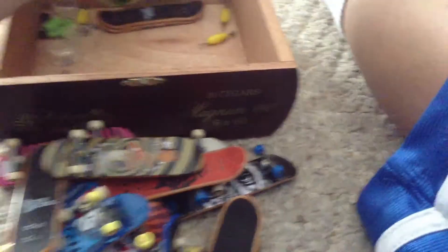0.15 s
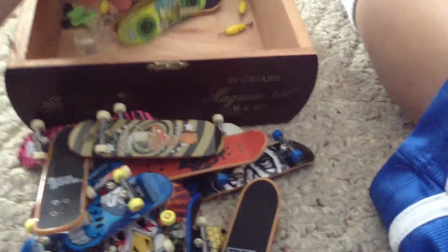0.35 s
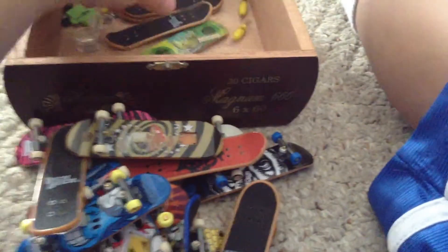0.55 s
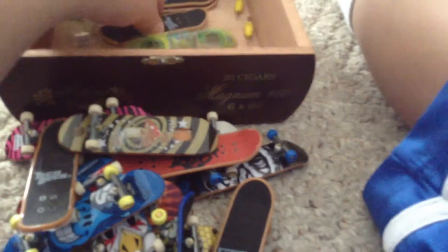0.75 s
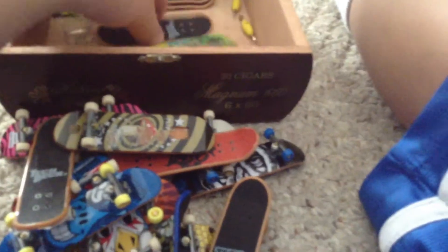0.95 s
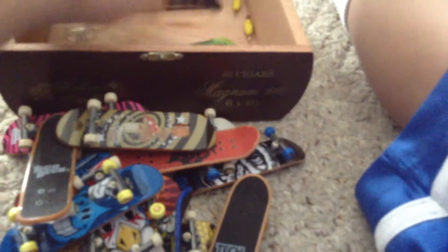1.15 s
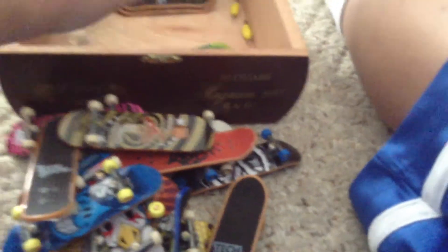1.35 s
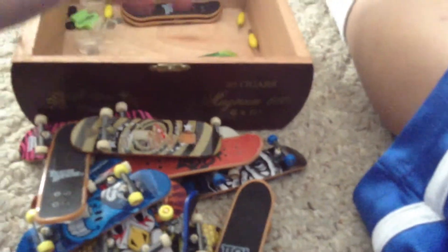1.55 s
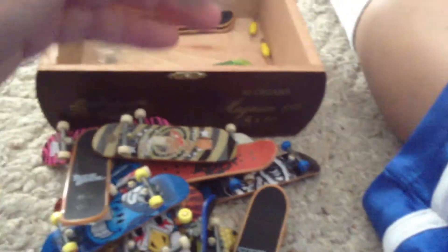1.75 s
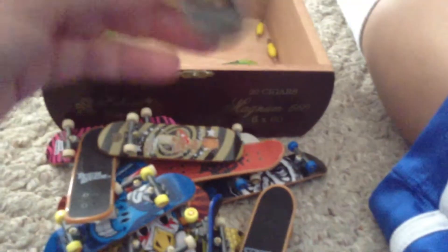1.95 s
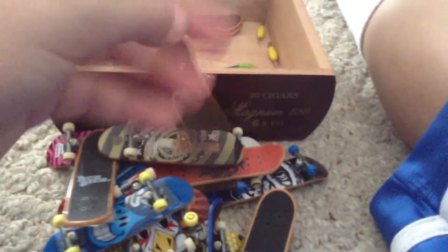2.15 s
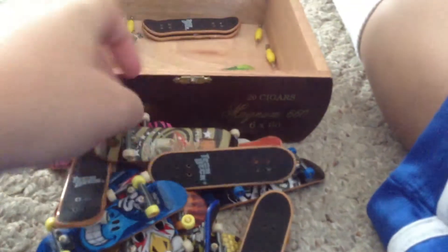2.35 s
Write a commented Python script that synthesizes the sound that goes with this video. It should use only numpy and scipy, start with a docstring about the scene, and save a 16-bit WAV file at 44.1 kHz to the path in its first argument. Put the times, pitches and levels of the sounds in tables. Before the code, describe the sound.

Small hard toy boards clatter and slide in a wooden box, soft hand bumps follow, then after a quiet gap one sharp knock and quick bright clicks on a pile; small quiet room, close microphone.

```python
"""A small quiet room: a hand drops and shuffles small plastic toy boards in a wooden box, then picks at a pile
of them on a carpet. Each contact is a brief noise crack that excites damped resonances of the box, wheels or a deck.
Random stick-slip catches make the sliding and rubbing; damped low tones with dull noise make the hand's bumps.
Filtered noise makes an arm brushing past and the still air, and decaying noise echoes make the room's answer."""
import sys
import numpy as np
from scipy import signal
from scipy.fft import rfft, irfft
from scipy.io import wavfile

SR = 44100
rng = np.random.default_rng(int(sys.argv[2]) if len(sys.argv) > 2 else 0)


def master(y):
    """Save y as 16-bit WAV."""
    cut = np.clip(np.atleast_2d(y).T, -1, 1)
    pcm = np.round(cut * 32767)  # scale
    wavfile.write(sys.argv[1], SR, pcm.astype(np.int16))


N = 110250  # length in samples

# Boards falling and knocking in the box. Each row: start in seconds, relative level in dB, tilt in dB per octave,
# contact time scale in ms, note of the struck board in Hz.
BOX_HITS = [(.2455, -8, 0.5, 3.3, 2210), (.2625, -9, 2, 2.4, 2760), (.2715, -10, 1, 1.4, 6130),
            (.279, -0.5, 0, 0.98, 3383), (.2855, -6, -1.5, 1.5, 3460), (.3175, -6.5, -1.5, 2.7, 3370),
            (.3762, -3, 1.5, 2.1, 2420), (.390, -25, -0.5, 5, 2410), (.4165, -8.5, 3, 2.1, 3460),
            (.4375, -19, -2.5, 3.5, 3450), (.443, -12, -0.5, 3.3, 2450), (.455, -13.5, 1.5, 7.7, 3410),
            (.4745, -13.5, 0.5, 2.1, 5020), (.535, -21.5, -4.5, 3.8, 2220), (.552, -19, 1, 5.2, 2280),
            (.628, -23, 0, 8.5, 3000), (.6485, -7, -0.5, 4.9, 2390), (.661, -2, 2, 1.7, 4200),
            (.863, -22, -1.5, 6.7, 2170), (.871, -19.5, 0, 1.4, 4200), (.925, -26, -3, 2.6, 2190),
            (.936, -22.5, -4, 11, 1920), (.968, -29.5, -1, 4.4, 760), (1.0095, -17, 2.5, 2.5, 3140),
            (1.020, -25, 0.5, 3.5, 3230)]
# Resonances of the box. Each row: frequency in Hz, relative level in dB, 60 dB decay time in seconds.
BOX_MODES = [(315, -10.5, 0.12), (395.4, -8.5, 0.069), (678.5, -5, 0.066), (818, -7.5, 0.035),
             (1208, -9, 0.088), (1692, -2.5, 0.019), (1878, -10.5, 0.12), (2472, -3, 0.05),
             (5050, -9, .015)]
# Colour of a crack in the box. Each row: frequency in Hz, gain in dB.
BOX_CRACK_COLOUR = [(150, -30), (330, -3.5), (1000, -2), (2200, 1.5), (2900, -4.5), (5200, -7),
                    (9000, -15.5), (15500, -29)]
BOX_DB, BOX_RING_DB = -25.5, -3  # all contacts; ring against crack


def box_hits():
    """Impact excitation: boards strike the wooden box and set its modes ringing."""
    hits = strikes(BOX_HITS, BOX_CRACK_COLOUR, BOX_MODES, BOX_RING_DB, detune=0.018, wet_db=-1)
    return undb(BOX_DB) * hits


# Bright clicks of wheels and deck edges, mostly on the pile. Each row: start in seconds, relative level in dB,
# tilt in dB per octave, contact time scale in ms.
PILE_CLICKS = [(.2455, -11, 1, 1.17), (2.0785, -22, -6, 0.91), (2.0872, -30, -3, 1.2),
               (2.090, -15, -1.5, 6.7), (2.1503, -18, -3, 4.7), (2.1923, -14, -0.5, 2.1),
               (2.2003, -10.5, 9, 0.4), (2.203, -6.5, 1.5, 0.87), (2.206, -17.5, -2, 1.9),
               (2.2112, -8, 5, 0.59), (2.2413, -21.5, -2.5, 0.64), (2.259, -23.5, -3, 2.2),
               (2.289, -31.5, 0.5, 5.5)]
# Resonances of the wheels. Each row: frequency in Hz, relative level in dB, 60 dB decay time in seconds.
WHEEL_MODES = [(6125, -6, 0.0059), (8120, -1, 0.0051)]
# Colour of a crack on the pile. Each row: frequency in Hz, gain in dB.
PILE_CRACK_COLOUR = [(60, -46.5), (250, -8), (600, -4), (1100, -15.5), (2000, 0), (4000, -5), (6500, 1.5),
                     (10000, 1), (15500, -5)]
PILE_DB, PILE_RING_DB = -25, -4  # all contacts; ring against crack


def pile_clicks():
    """Impact of small stiff parts: short contacts excite high, quickly damped modes."""
    clicks = strikes(PILE_CLICKS, PILE_CRACK_COLOUR, WHEEL_MODES, PILE_RING_DB, detune=0.03, wet_db=-2)
    return undb(PILE_DB) * clicks


# Blows that ring a whole deck. Each row: start in seconds, relative level in dB, tilt in dB per octave,
# contact time scale in ms.
DECK_KNOCKS = [(2.0785, 2, 0.5, 0.86), (2.2225, -21, -4, 2.3), (2.262, -31, 1, 2.2), (2.399, -33, -4, 4.3),
               (2.425, -35, -5.5, 5), (2.477, -40.5, 1, 3.2)]
# Resonances of a deck. Each row: frequency in Hz, relative level in dB, 60 dB decay time in seconds.
DECK_MODES = [(322, -16.5, 0.057), (778.4, 4, 0.068), (792.4, 1, 0.063), (1207, -9, 0.036),
              (1660, 2.5, 0.007), (1973, -3.5, 0.025), (2430, -8.5, 0.2), (2550, -5.5, 0.074),
              (4100, -4.5, 0.023)]
# Colour of a crack on a deck. Each row: frequency in Hz, gain in dB.
DECK_CRACK_COLOUR = [(160, -29), (350, -3), (800, -20.5), (1800, 3.5), (3800, -6.5), (15000, -29)]
DECK_DB, DECK_RING_DB = -26.5, 3.5  # all contacts; ring against crack


def deck_knocks():
    """Modal vibration of a plate: a blow rings the whole deck."""
    knocks = strikes(DECK_KNOCKS, DECK_CRACK_COLOUR, DECK_MODES, DECK_RING_DB, detune=0.0024, wet_db=-5)
    return undb(DECK_DB) * knocks


BOARD_RING_DB, BOARD_T60_S = -5.5, 0.028


def strikes(hits, crack_colour, modes, ring_db, detune, wet_db, size=4096):
    """Modal superposition: each crack excites the modes differently, and a loose board adds its own note."""
    out = np.zeros(N)
    t = np.arange(size) / SR
    mode_hz, mode_db, mode_t60 = np.array(modes).T
    for at, db, tilt, ms, *board_notes in hits:
        hz_spread, phase_spread = rng.standard_normal((2, len(mode_hz)))
        struck_hz = mode_hz * (1 + detune * hz_spread)
        gains = undb(mode_db + tilt * np.log2(mode_hz / mode_hz.mean()))
        ring = np.zeros(size)
        for gain, hz, t60, phase in zip(gains, struck_hz, mode_t60, np.pi * phase_spread):
            ring += gain * mode(t, hz, t60, phase)
        board = sum(mode(t, hz, BOARD_T60_S) for hz in board_notes)
        contact = unit(colour(crack(t, ms), crack_colour, tilt))
        contact = contact + undb(ring_db) * unit(ring) + undb(BOARD_RING_DB) * board
        add(out, at, room(undb(db) * unit(contact), wet_db))
    return out


PATCH_HZ, PATCH_DB = 420, 4.5  # spacing and spread of the spectral peaks and dips


def crack(t, ms, rise=0.12):
    """Broadband excitation: micro-contacts die in a few ms, with peaks and dips set by the spot struck."""
    u = t * 1000 / max(ms, 0.2)  # time in units of the contact time scale
    burst = rng.standard_normal(len(t)) * np.exp(-(u / 1.6) ** 1.6) * (1 - np.exp(-u / rise))
    spot_hz = np.arange(PATCH_HZ, SR / 2, PATCH_HZ)
    spread = np.clip(rng.standard_normal(len(spot_hz)), -1.5, 1.5)
    spot_db = PATCH_DB * spread * np.minimum(spot_hz / 2500, 1)  # smaller in the bass
    # Dividing by the root of the magnitude halves the spectrum's unevenness in dB.
    spectrum = rfft(burst)
    even = irfft(spectrum / np.sqrt(np.abs(spectrum) + 1e-9)) * np.exp(-(u / 5) ** 2)
    return unit(colour(even, np.c_[spot_hz, spot_db]))


def mode(t, hz, t60, phase=0):
    """Damped harmonic oscillation: one resonance with a soft onset and an energy of one."""
    decay = np.exp(-np.log(1000) * t / t60)
    onset = 1 - np.exp(-t * hz)
    return unit(np.sin(2 * np.pi * hz * t + phase) * decay * onset)


# Soft bumps of the hand on the box. Each row: start in seconds, relative level in dB, pitch in Hz, decay in ms.
BUMPS = [(.002, -22.5, 409, 12.3), (0.59, -20.5, 192, 7.3), (0.613, -15, 216, 7.9),
         (0.95, -24.5, 417, 12.7), (0.975, -18.5, 315, 7.2), (1.358, -30.5, 322, 3)]
BUMP_DB = -33


def bumps(knock_db=-5, size=6000):
    """Soft impact: flesh on wood gives a low damped note and a dull noise knock."""
    out = np.zeros(N)
    t = np.arange(size) / SR
    knock_colour = [(70, -23.0), (200, 0), (650, 4.5), (1500, -24.5), (6000, -42)]  # Hz, dB
    for at, db, hz, ms in BUMPS:
        fade = np.exp(-t * 1000 / ms)
        note = np.sin(2 * np.pi * hz * t) * fade * (1 - np.exp(-t / 0.0031))
        knock = colour(rng.standard_normal(size) * fade, knock_colour)
        add(out, at, undb(db) * (unit(note) + undb(knock_db) * unit(knock)))
    return out * undb(BUMP_DB)


# Boards sliding in the box. Each row: time in seconds, level in dB.
SLIDE = [(0, -43), (0.037, -65.5), (0.233, -60.5), (0.261, -28.5), (.33, -46), (.36, -36.5), (.45, -37.5),
         (.52, -59.5), (.60, -59), (0.689, -36), (.76, -53), (.85, -43), (.97, -51), (1.1, -76.5)]
GRAINS_PER_S = 900


def slide(tilt=-1, ring_db=-7, size=8000):
    """Stick-slip friction: dense tiny catches of sliding boards, heard through the box's modes."""
    t = np.arange(size) / SR
    grains = catches(GRAINS_PER_S, N)
    box_response = sum(undb(db) * mode(t, hz, t60) for hz, db, t60 in BOX_MODES)
    ring = signal.fftconvolve(grains, box_response)[:N]
    scrape = unit(colour(grains, BOX_CRACK_COLOUR, tilt))
    return shaped(scrape + undb(ring_db) * unit(ring), SLIDE)


# Short rubs of fingers and boards. Each row: middle in seconds, length in seconds, level in dB,
# centre frequency in Hz, bandwidth in Hz.
RUBS = [(0.128, 0.031, -56.5, 9800, 6000), (.18, 0.063, -60, 9500, 5000), (0.832, 0.072, -50, 5150, 600),
        (0.973, 0.044, -41, 670, 350), (2.291, .035, -51.5, 2630, 447), (2.41, .09, -54, 774, 171),
        (2.412, .1, -57.5, 1940, 1860)]
RUB_GRAINS_PER_S = 1500


def rubs(size=8192):
    """Friction through a resonance: gritty catches swell and fade through one band."""
    out = np.zeros(N)
    t = np.arange(size) / SR
    for at, length, db, hz, width in RUBS:
        swell = np.sin(np.pi * np.minimum(t / length, 1))
        edges = [max(hz - width / 2, 20), min(hz + width / 2, SR / 2 - 1)]
        band = signal.butter(2, edges, "band", fs=SR, output="sos")
        rub = signal.sosfilt(band, swell * catches(RUB_GRAINS_PER_S, size))
        add(out, at - length / 2, undb(db) * unit(rub) * np.sqrt(length * SR))
    return out


GRAIN_SPREAD_DB = 6.5


def catches(per_s, size):
    """Random impulse process: stick-slip catches of uneven strength and either sign."""
    happens = rng.random(size) < per_s / SR
    sign = rng.choice([-1, 1], size)
    strength = undb(GRAIN_SPREAD_DB * np.minimum(rng.standard_normal(size), 2))
    return happens * sign * strength


# Arm brushing past. Each row: time in seconds, level in dB.
BRUSH = [(.75, -59), (.98, -53.5), (1.129, -68.5), (1.3, -56), (1.8, -66), (2.05, -69.5), (2.42, -58),
         (2.5, -68)]
# Colour of the brushing. Each row: frequency in Hz, gain in dB.
BRUSH_COLOUR = [(3000, -4), (7000, 0), (13000, 0), (16000, -5)]


def brush():
    """Broadband friction noise: the soft hiss of a moving arm swells and fades."""
    return shaped(colour(rng.standard_normal(N), BRUSH_COLOUR), BRUSH)


# Colour of the still room air. Each row: frequency in Hz, gain in dB.
AIR_COLOUR = [(40, -33.5), (120, -9.5), (270, 0.5), (520, -9), (2000, -16), (15000, -26.5)]
AIR_DB = -64.5


def air():
    """Stationary noise: still room air at a constant average level."""
    return unit(colour(rng.standard_normal(N), AIR_COLOUR)) * np.sqrt(N) * undb(AIR_DB)


# Decay of the room's tail by band. Each row: frequency in Hz, 60 dB decay time in seconds.
ROOM_T60 = [(400, 0.62), (2500, 0.42), (9000, 0.29)]
# Colour of the echoes. Each row: frequency in Hz, gain in dB.
ROOM_COLOUR = [(150, -6.5), (600, -1.5), (15000, -4)]
ROOM_DB, EARLY_DB = -14, -6  # tail and quick reflections, before their colour
EARLY_S, ROOM_ONSET_S = 0.02, 0.0045  # decay constant of the reflections; rise of all echoes


def room(x, wet_db=0, size=16384):
    """Reverberation: quick reflections, then a tail whose treble dies first, in a new pattern at each call."""
    t = np.arange(size) / SR
    hz = np.arange(size // 2 + 1) * SR / size
    noise = rfft(rng.standard_normal(size))
    tail = np.zeros(size)
    for k, (_, t60) in enumerate(ROOM_T60):
        # Overlapping bands: one at this row's frequency, zero at the others.
        band = on_log([(f, j == k) for j, (f, _) in enumerate(ROOM_T60)], hz)
        tail += irfft(noise * band) * np.exp(-np.log(1000) * t / t60)
    early = rng.standard_normal(size) * np.exp(-t / EARLY_S)
    onset = np.minimum(t / ROOM_ONSET_S, 1) ** 2
    echo = undb(ROOM_DB) * unit(tail * onset) + undb(EARLY_DB) * unit(early * onset)
    echo = colour(echo, ROOM_COLOUR) * undb(wet_db)
    echo[0] += 1  # direct sound
    return signal.fftconvolve(x, echo)[:N]


def undb(db):
    """Logarithmic level: decibels to amplitude gain."""
    return 10 ** (np.asarray(db) / 20)


def unit(x):
    """Energy normalisation: scale to a sum of squares of one."""
    return x / np.sqrt(np.sum(x ** 2))


def on_log(points, hz):
    """Logarithmic frequency scale: interpolate (Hz, value) points along it."""
    f, v = np.array(points, float).T
    return np.interp(np.log(np.maximum(hz, 1)), np.log(f), v)


def colour(x, points, tilt=0):
    """Minimum-phase filtering: causal filter through (Hz, dB) points, tilted in dB per octave about 2 kHz."""
    size = 2 * len(x)
    hz = np.maximum(np.arange(len(x) + 1) * SR / size, 1)
    gain_db = on_log(points, hz) + tilt * np.log2(np.maximum(hz, 400) / 2000)  # tilt levels off below 400 Hz
    # Folding the cepstrum onto positive times makes the filter causal.
    cepstrum = irfft(np.log(undb(gain_db)))
    cepstrum[1:len(x)] *= 2
    cepstrum[len(x) + 1:] = 0
    return irfft(rfft(x, size) * np.exp(rfft(cepstrum)))[:len(x)]


def add(out, at, x):
    """Linear superposition: mix a sound in at a time in seconds."""
    i = max(int(at * SR), 0)
    out[i:i + len(x)] += x[:max(N - i, 0)]


def shaped(x, curve):
    """Amplitude modulation: make a steady sound follow a (s, dB) curve."""
    seconds, db = np.array(curve).T
    level_db = np.interp(np.arange(N) / SR, seconds, db)
    return unit(x) * np.sqrt(N) * undb(level_db)


def scene():
    """Superposition of sources: clatter in the box, then on the pile, which is nearer and so drier."""
    impacts = box_hits() + pile_clicks() + deck_knocks() + room(bumps())
    friction = room(slide() + rubs())
    background = brush() + air()
    mix = impacts * np.sqrt(SR) / 2 + friction + background
    return mix[None]


TOP_HZ = 15400


def record(dry, ceiling=0.85, low_cut_hz=130):
    """Band limiting and saturation: the microphone thins the bass, rounds the loudest peaks and cuts the top."""
    low_cut = signal.butter(2, low_cut_hz, "high", fs=SR, output="sos")
    top_cut = signal.ellip(8, 0.2, 70, TOP_HZ, fs=SR, output="sos")
    thin = signal.sosfilt(low_cut, dry)
    rounded = ceiling * np.tanh(thin / ceiling)
    return signal.sosfilt(top_cut, rounded)


dry = scene()
out = record(dry)
master(out)
```